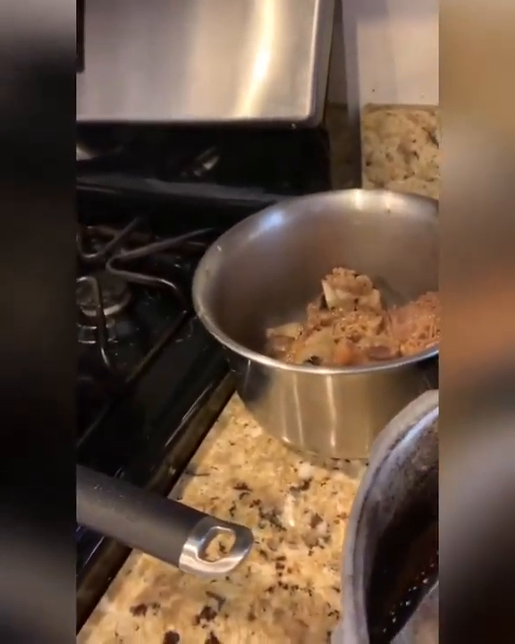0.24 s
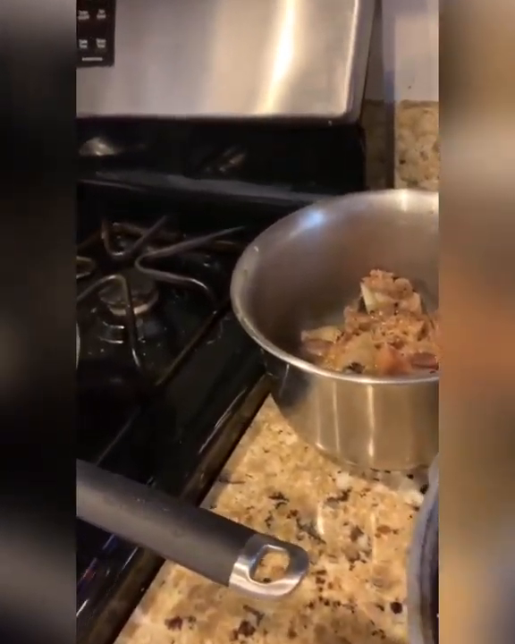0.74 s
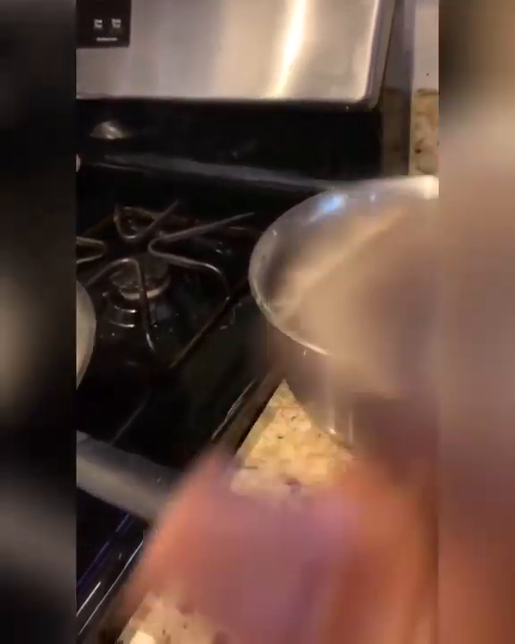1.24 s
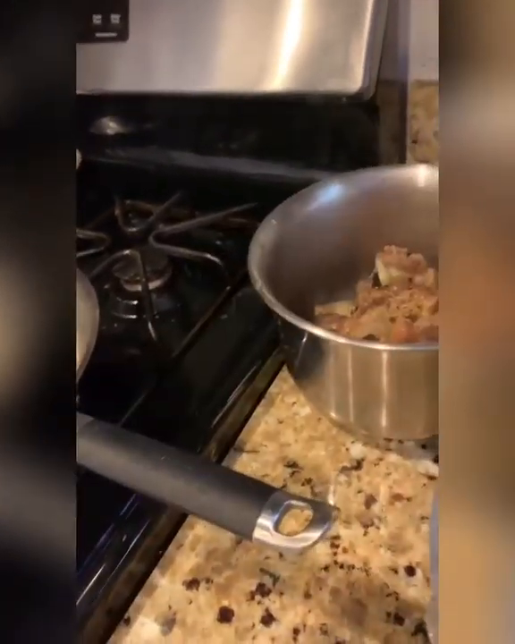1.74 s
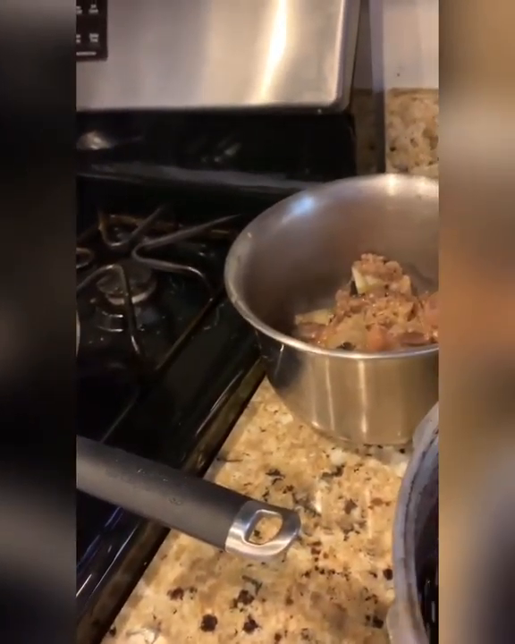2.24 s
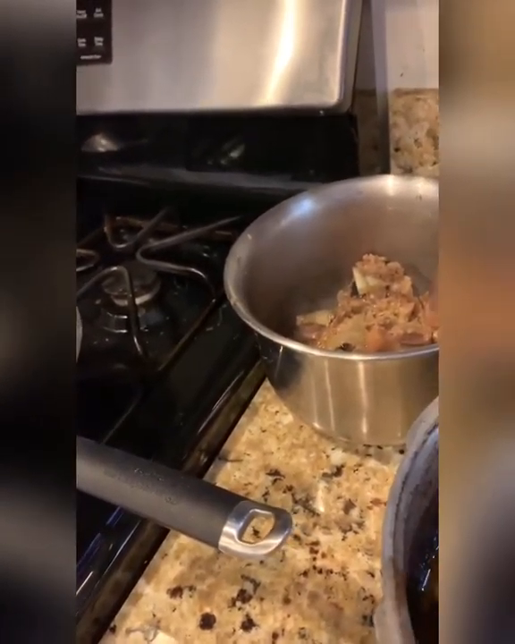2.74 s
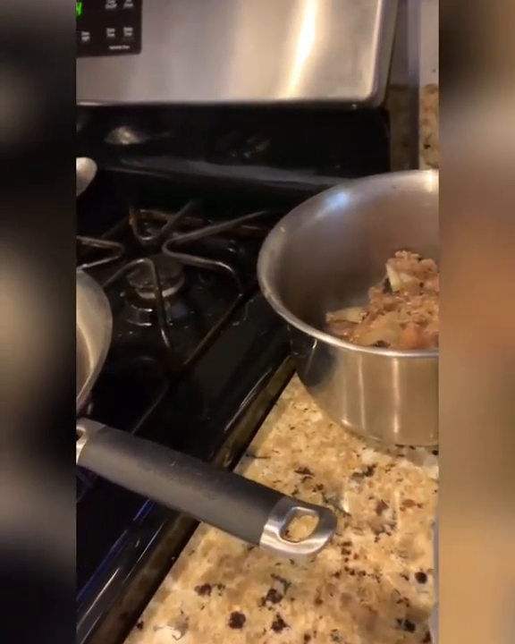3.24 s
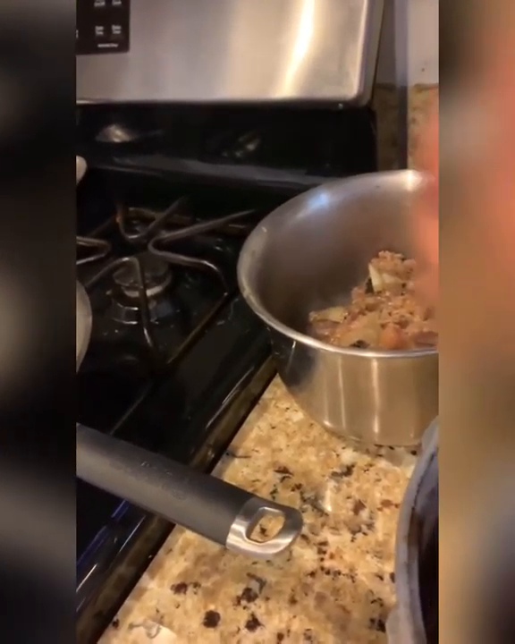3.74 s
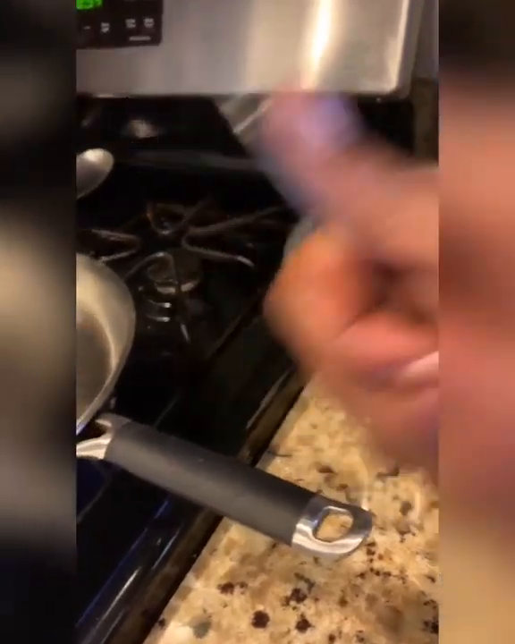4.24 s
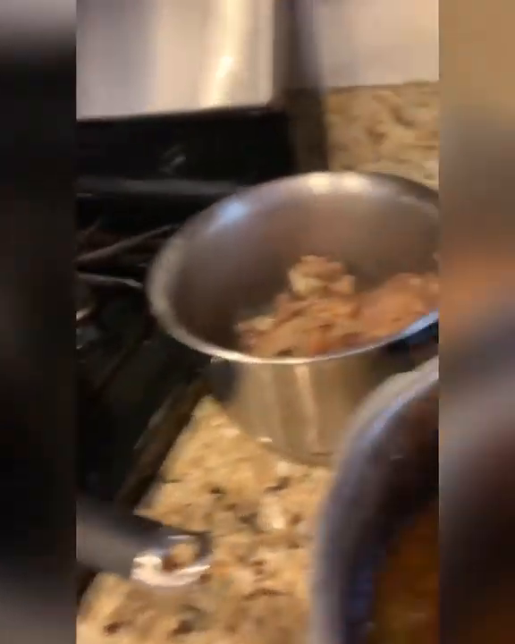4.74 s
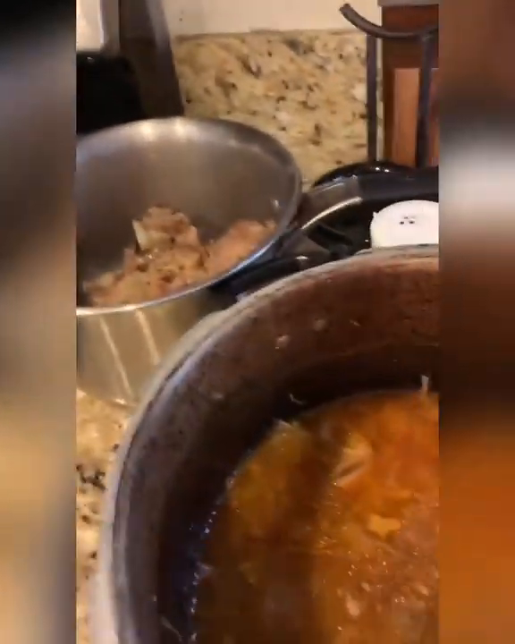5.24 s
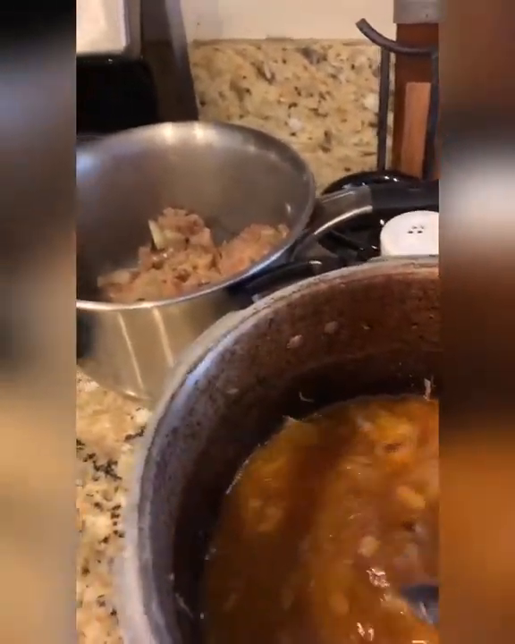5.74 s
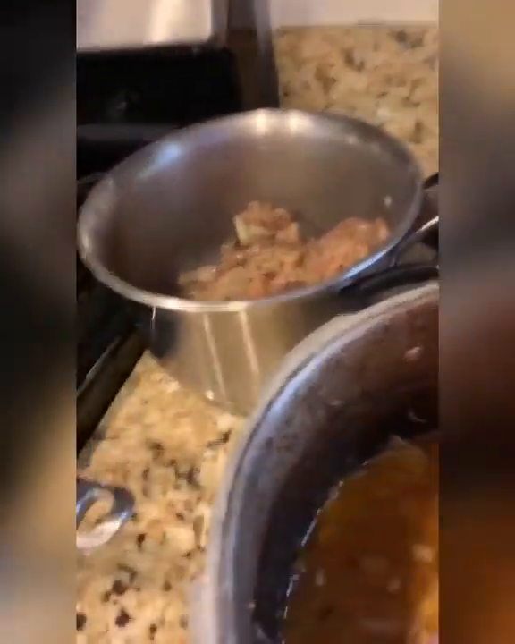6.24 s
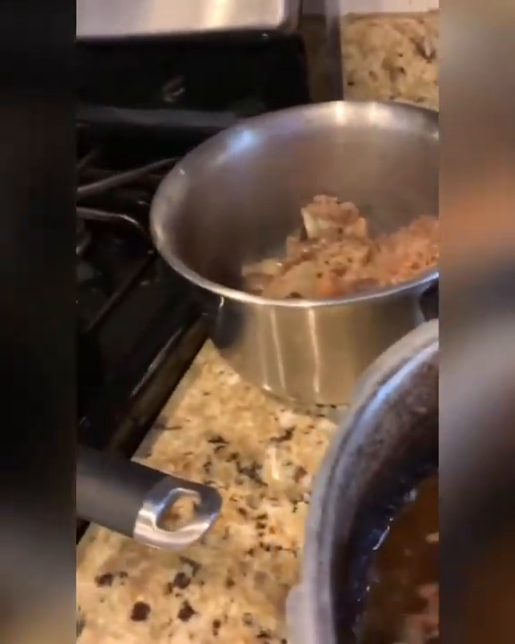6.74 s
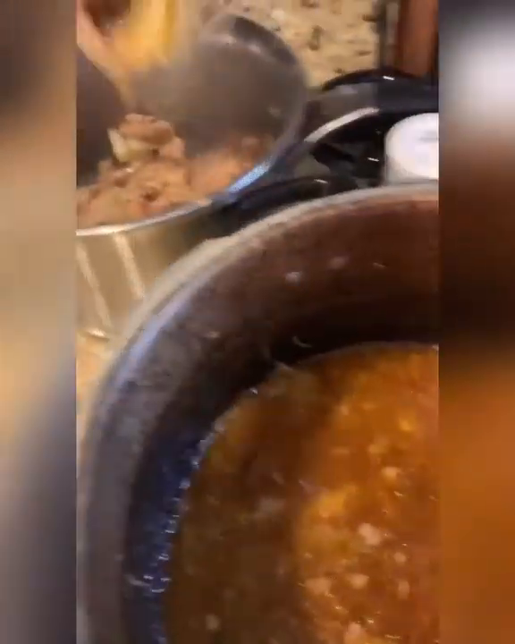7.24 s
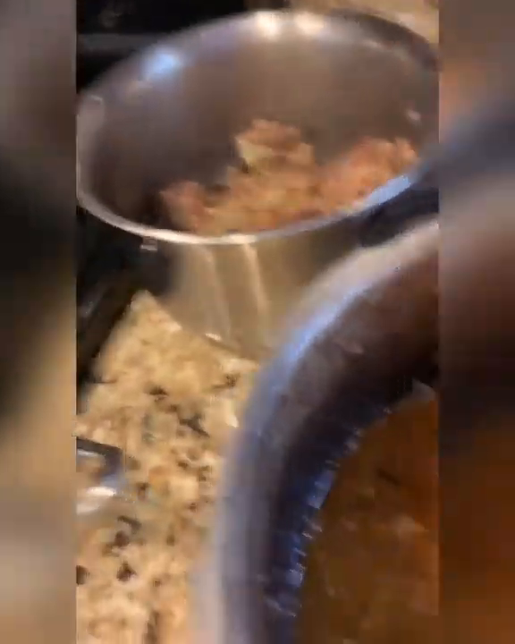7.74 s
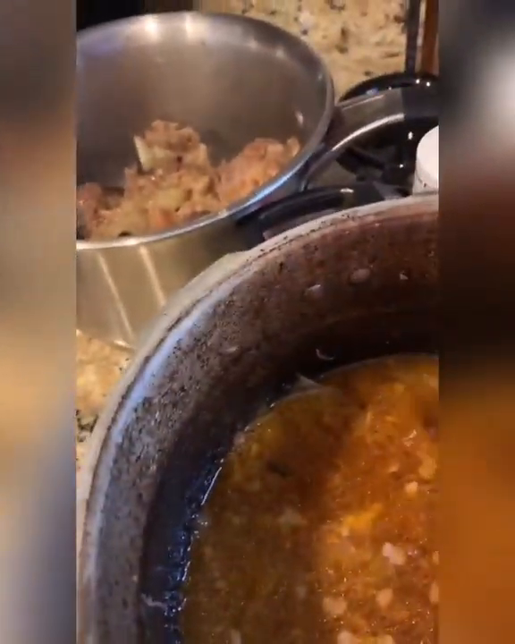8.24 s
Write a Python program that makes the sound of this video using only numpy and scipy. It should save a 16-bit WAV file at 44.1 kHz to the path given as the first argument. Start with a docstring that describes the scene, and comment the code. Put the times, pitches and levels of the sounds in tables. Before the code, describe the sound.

A handheld phone picks up a spoon working at a stew-filled pot on a counter: first light scrapes and ticks with a soft thud, then a dense cluster of scraping, scattered taps, and a sharp cracking knock just past five seconds. A quieter stretch of bubbles and small clicks leads to a hard ringing clank at eight seconds. Narrow hiss, rustling air and low rumble continue behind, with a short hard-walled room tail.

```python
"""Kitchen counter, hand-held phone close to a steel pot of thick stew; a metal spoon scrapes and knocks it.
From the start a steady hiss with narrow resonances, airy puffs and a low rumble lie behind the spoon.
Scrapes crowd together near 3 s; from 4.4 to 5.1 s the hiss changes colour as the phone turns to the stew.
A sharp knock with a bright crack follows at 5.2 s and the hardest knock at 8 s; bubbles, ticks and thuds dot it.
Each contact is a burst of grit that rings rim and stew-damped wall; the background is shaped noise."""
import sys
import numpy as np
from scipy import signal
from scipy.fft import rfft, irfft
from scipy.io import wavfile
from scipy.ndimage import uniform_filter1d

SR = 44100
rng = np.random.default_rng(int(sys.argv[2]) if len(sys.argv) > 2 else 0)


def digitize_waveform(pressure):
    """Quantize a signal to 16-bit integers and store it at the path in sys.argv[1].

    Rows of a 2-D input are taken as channels; values are limited to [-1, 1].
    """
    field = np.atleast_2d(pressure).T
    bounded = np.clip(field, -1, 1)
    quanta = np.round(bounded * 32767).astype(np.int16)
    wavfile.write(sys.argv[1], SR, quanta)


N = 374850


def undb(db):
    """Amplitude factor of a level in dB."""
    return 10 ** (np.asarray(db) / 20)


def fall(t, t60):
    """Exponential decay that loses 60 dB in t60 seconds."""
    return np.exp(-np.log(1000) * t / max(t60, 1e-3))


def seconds(length):
    """Time axis of the given length in s."""
    return np.arange(int(length * SR)) / SR


def add(out, s, x, db):
    """Mix x in at time s with the given peak level."""
    i = int(s * SR)
    x = x[:N - i]
    out[i:i + len(x)] += x * undb(db) / np.max(np.abs(x))


def band(x, hz, octaves):
    """Causal band-pass round hz."""
    edges = [hz * 2 ** (-octaves / 2), hz * 2 ** (octaves / 2)]
    edges = np.clip(edges, 20, .45 * SR)
    return signal.sosfilt(signal.butter(2, edges, "band", fs=SR, output="sos"), x)


def curve(rows):
    """Straight lines through (s, value) points over the whole scene."""
    return np.interp(np.arange(N) / SR, *np.transpose(rows))


def held_noise(count, hold):
    """Random levels held for some samples each, then slewed over the same span."""
    steps = np.repeat(rng.standard_normal(count // hold + 1), hold)
    return uniform_filter1d(steps, hold)[:count]


def walk(rate):
    """Random levels held 1 / rate s and slewed; spread near 1."""
    return 1.6 * held_noise(N, int(SR / rate))


def coloured(colour, peaks=()):
    """Noise of rms 1 with the given spectrum and resonances."""
    f = np.arange(1, N // 2 + 2) * SR / N
    hz, db = np.transpose(colour)
    gain = undb(np.interp(np.log(f), np.log(hz), db))
    for centre, width, rise_db in peaks:
        gain = gain * undb(rise_db / (1 + (2 * (f - centre) / width) ** 2))
    x = irfft(rfft(rng.standard_normal(N)) * gain, N)
    return x / np.std(x)


def flicker(x, edges_hz, depth_db, rate):
    """Each band of a steady noise wanders in level on its own."""
    f, spectrum = np.arange(N // 2 + 1) * SR / N, rfft(x)
    out = np.zeros(N)
    for lo, hi in zip(edges_hz, edges_hz[1:]):
        one_band = irfft(spectrum * (f >= lo) * (f < hi), N)
        out += one_band * undb(depth_db * walk(rate))
    return out


def ring(modes, favoured_hz, reach, t):
    """A struck body: the place of contact favours modes near one pitch, falling reach dB per octave away."""
    out = 0
    for k, (hz, db, t60) in enumerate(modes):
        level = undb(db - reach * abs(np.log2(hz / favoured_hz)))
        # neighbouring modes swing in opposition
        out = out + (-1) ** k * level * fall(t, t60) * np.sin(2 * np.pi * hz * t)
    return out


# Level of the deep bass, gustier while the phone is handled. Each row: time in seconds, level in dB.
DEEP_LEVEL = [(0.0, -57), (0.31, -72), (0.71, -50), (1.42, -66), (1.63, -53), (2.1, -73), (2.74, -60),
              (3.03, -80), (6.23, -69.5), (6.42, -73), (8.07, -69), (8.5, -79)]
# Colour of the deep bass. Each row: frequency in Hz, relative spectrum level in dB.
DEEP_SPECTRUM = [(15, -32), (30, -27), (60, -12), (100, -19), (200, -58)]


def deep_bass():
    """Bass noise whose level wanders about a gusty course."""
    return coloured(DEEP_SPECTRUM) * undb(curve(DEEP_LEVEL) + 2.0 * walk(5.8))


# Level of the room rumble before it flickers. Each row: time in seconds, level in dB.
RUMBLE_LEVEL = [(0.0, -57), (0.47, -59), (0.8, -55), (1.94, -59.5), (2.89, -50.5), (3.1, -54.5), (4.5, -58),
                (4.95, -55.5), (6.94, -60), (8.5, -57)]
# Colour of the rumble. Each row: frequency in Hz, relative spectrum level in dB.
RUMBLE_SPECTRUM = [(15, -50), (25, -27), (53, -6.5), (113, 5), (167, -1.5), (300, -4), (408, -3),
                   (444, -14), (476, -9.5), (637, -9), (682, -6), (1030, -15), (1500, -20.5), (1950, -15),
                   (3300, -120)]


def room_rumble():
    """Low noise, flickering in bands two thirds of an octave wide."""
    rumble = coloured(RUMBLE_SPECTRUM) * undb(curve(RUMBLE_LEVEL))
    return flicker(rumble, 25 * 2 ** (2 * np.arange(11) / 3), 2.57, 6.0)


# Airy treble that comes and goes in puffs. Each row: time in seconds, gain in dB before it wanders.
RUSTLE_GAIN = [(0, -64), (.4, -60), (1.3, -64), (1.85, -59.5), (2.1, -72), (2.5, -61.5), (3.3, -70),
               (4.7, -68), (5.2, -67), (6.9, -65.5), (7.3, -71.5), (8.1, -64.5), (8.5, -67)]


def airy_rustle():
    """Wide treble noise whose level puffs and wanders quickly."""
    treble = band(rng.standard_normal(N), 7900, 2.5)
    return treble * undb(curve(RUSTLE_GAIN) + 4.1 * walk(22.0))


# Smooth hiss colour, phone facing the stove and then the stew.
# Each row: frequency in Hz, relative spectrum level in dB.
STOVE_COLOUR = [(700, -61), (1000, -43), (1500, -2.5), (2270, 2.5), (3000, 1), (4360, 6.5), (5600, 3),
                (7000, -6.5), (8000, -24.5), (11500, -28.5), (16000, 2)]
STEW_COLOUR = [(530, 4), (900, 7), (1570, -5), (2040, -6), (3960, 5.5), (5040, -3), (6330, -6.5),
               (8150, -10), (9770, -4.5), (11600, -41), (16000, 3.5)]
# Narrow resonances on each hiss. Each row: centre in Hz, width in Hz, rise above the smooth colour in dB.
STOVE_WHISTLES = [(2100, 36, 16.6), (2776, 730, 20), (3900, 190, 15), (6360, 550, 12), (6790, 200, 18),
                  (8820, 500, 28.6), (9860, 320, 30.5)]
STEW_WHISTLES = [(2115, 73, 16.5), (2664, 790, 14.5), (4020, 14, 12.6), (6190, 160, 18.8),
                 (6600, 280, 13.3), (7090, 550, 13.8), (10220, 690, 11)]
TURN_START_S, TURN_END_S = 4.4, 5.1
HISS_DB = -56.5  # rms before it flickers


def steady_hiss():
    """Two resonant noises cross-faded at equal power as the phone turns from stove to stew."""
    turn = curve([(TURN_START_S, 0), (TURN_END_S, 1)])
    stove = np.sqrt(1 - turn) * coloured(STOVE_COLOUR, STOVE_WHISTLES)
    stew = np.sqrt(turn) * coloured(STEW_COLOUR, STEW_WHISTLES)
    return (stove + stew) * undb(HISS_DB)


def kitchen():
    """Background behind the pot: hiss and rustle flicker together in narrow bands, over rumble and bass."""
    air = flicker(steady_hiss() + airy_rustle(), 400 * 2 ** (np.arange(49) / 8), 1.22, 12.0)
    return deep_bass() + room_rumble() + air


# Pot and elbows bumping the counter. Each row: start in seconds, peak level in dB, pitch in Hz.
COUNTER_BUMPS = [(0.73, -30.5, 139.5), (0.785, -37.5, 159), (0.961, -43.5, 107), (1.17, -48, 113),
                 (1.478, -50, 135), (0.931, -42, 133.6), (2.412, -27, 119.3), (2.868, -38.5, 116),
                 (3.496, -35.5, 164.6), (3.953, -46.5, 196), (4.808, -36.5, 162), (4.89, -39, 162),
                 (5.101, -45.5, 157), (5.217, -35.5, 142), (7.388, -42, 182.5), (7.986, -36, 194.4),
                 (7.996, -35.5, 123)]
THUD_T60_S = 0.25


def thuds():
    """Soft blows on the counter: one low mode, slowly pushed."""
    out, t = np.zeros(N), seconds(.4)
    for s, db, hz in COUNTER_BUMPS:
        push = (1 - fall(t, 0.0057)) * fall(t, THUD_T60_S)
        add(out, s, push * np.sin(2 * np.pi * hz * t), db)
    return out


# Bubbles in the stew. Each row: start in seconds, peak level in dB, starting pitch in Hz,
# glide in octaves per second, decay t60 in seconds, time until it bursts in seconds.
STEW_BUBBLES = [(3.088, -19.5, 1014, 9.3, 0.081, 0.027), (5.293, -40.5, 1800, 92, 0.068, 0.013),
                (5.334, -32, 3360, 42, 0.029, 0.0072), (5.367, -46, 1690, 19, 0.061, 0.021),
                (6.28, -37, 1590, 14, 0.025, 0.012)]


def bubbles():
    """Air pockets rise in pitch as they near the surface, then burst."""
    out, t = np.zeros(N), seconds(.08)
    for s, db, hz, glide, t60, life in STEW_BUBBLES:
        pitch = hz * 2 ** (glide * np.minimum(t, life))
        tone = np.sin(2 * np.pi * np.cumsum(pitch) / SR)
        burst = fall(np.maximum(t - life, 0), 0.0062)
        add(out, s, np.clip(t / 0.003, 0, 1) * fall(t, t60) * burst * tone, db)
    return out


# Bits of food and sauce snapping, and at 5.22 s the bright crack of a spoon knock.
# Each row: start in seconds, peak level of the narrow core in dB, centre in Hz.
SHARP_TICKS = [(0.558, -42, 4610), (0.5971, -36, 7360), (0.975, -25.5, 5800), (1.0105, -43, 11500),
               (1.109, -42, 11500), (1.1916, -26, 6540), (1.4103, -44.5, 4230), (1.573, -41, 11000),
               (1.969, -32.5, 5150), (3.011, -32, 4470), (3.025, -35, 3870), (3.0948, -27.5, 5100),
               (3.321, -34, 2820), (4.478, -45, 5000), (4.982, -38.5, 7000), (5.2212, -12.5, 5300),
               (5.308, -33.5, 8600), (5.336, -31, 4930), (5.37, -44, 4900), (5.5562, -40, 9300),
               (6.3181, -30.5, 6050), (6.383, -37, 6600), (6.401, -36, 10500), (6.4224, -28, 6050),
               (6.761, -37, 9380), (6.9304, -30.5, 8900), (6.941, -39.5, 3200), (6.989, -33.5, 6930),
               (7.0032, -36, 5000), (7.007, -37, 12700), (7.264, -43, 5400), (7.3503, -33, 7460),
               (7.3677, -22, 6600), (7.452, -27.5, 3600), (7.4548, -26.5, 9150), (8.045, -24.5, 7500),
               (8.158, -21.5, 7050), (8.2355, -27, 4300), (8.2458, -24.5, 5600), (8.306, -29, 5030)]
TICK_SNAP_S, TICK_T60_S = 0.004, 0.067  # t60 of the snap and of its fizz
TICK_FIZZ, TICK_WIDE_DB = 0.14, -2  # fizz re snap; the broad snap re its narrow core


def ticks():
    """A sharp snap of noise with a weaker, longer fizz."""
    out, t = np.zeros(N), seconds(.06)
    for s, db, hz in SHARP_TICKS:
        snap = TICK_FIZZ * fall(t, TICK_T60_S) * rng.standard_normal(len(t))
        snap += fall(t, TICK_SNAP_S) * rng.standard_normal(len(t))
        snap[0] += 4.0  # the first break is the sharpest
        add(out, s, band(snap, hz, 0.38), db)
        add(out, s, band(snap, hz, 1.43), db + TICK_WIDE_DB)
    return out


# The spoon struck free and then gripped or dipped. Each row: start in seconds, peak level in dB,
# favoured mode in Hz, free ringing in seconds, fall-off from that mode in dB per octave.
SPOON_RINGS = [(3.315, -40, 5400, 0.04, 58), (4.796, -42, 5430, 0.06, 160), (4.797, -40, 2660, 0.019, 44),
               (4.886, -39, 2570, 0.013, 42), (4.897, -30.5, 2520, 0.032, 62),
               (4.895, -34.5, 5660, 0.0083, 90), (7.988, -16, 2620, 0.059, -2),
               (8.008, -26.5, 2130, 0.048, 64), (8.157, -43, 2100, 0.029, 55),
               (8.392, -43, 2210, 0.036, 60)]
# Modes of the steel spoon. Each row: pitch in Hz, level in dB before chatter, free decay t60 in seconds.
SPOON_MODES = [(1897, 0, 1.2), (2665, 1, .13), (3668, -6, .5), (4185, -10, .08), (4918, -3, .5),
               (5330, -9, .16), (6410, 0, .15), (6900, -6, .06), (8500, -8, .06), (10178, 3, .07),
               (10452, -4, .08)]
CHATTER_S, CHATTER_DB = 0.0082, 3.5  # step of the waver; its spread before slewing


def spoon():
    """Steel modes that waver as the spoon chatters in the hand, cut short when it is damped."""
    out, t = np.zeros(N), seconds(.25)
    for s, db, hz, free, narrow in SPOON_RINGS:
        modes = []
        for mode_hz, mode_db, t60 in SPOON_MODES:
            chatter_db = CHATTER_DB * held_noise(len(t), int(CHATTER_S * SR))
            modes.append((mode_hz, mode_db + chatter_db, t60))
        damped = fall(np.maximum(t - free, 0), 0.022)
        add(out, s, np.clip(t / 0.00145, 0, 1) * damped * ring(modes, hz, narrow, t), db)
    return out


def shimmer(x, t60, count=64):
    """Through the many short high modes of thin steel, different at every spot."""
    t = seconds(.04)
    place, phase = rng.random((2, count, 1))
    hz = 900 * 18 ** ((np.arange(count)[:, None] + place) / count)
    modes = (np.sqrt(hz) * np.sin(2 * np.pi * (hz * t + phase))).sum(axis=0)
    return signal.fftconvolve(x, modes * fall(t, t60))[:len(x)]


# Modes of the stew-damped pot wall, before detuning and the spoon's pressure.
# Each row: pitch in Hz, level in dB, decay t60 in seconds.
WALL_MODES = [(270, 0, .11), (330, -3, .1), (435, -6, .11), (510, -6, .06), (562, -2, .07), (600, -3, .055),
              (710, -12, .06), (785, -12, .06), (1050, -15, .17), (1088, 1, .058), (1595, -3, .04)]
# Modes of the pot's rim. Each row: pitch in Hz, level in dB, decay t60 in seconds.
RIM_MODES = [(1400, -23, 0.34), (1811, 22, 0.021), (2008, 10.5, 0.093), (2220, 22, 0.017),
             (2620, 14, 0.022), (3504, 5, 0.039), (3915, 12.5, 0.015), (4690, 7.5, 0.024), (4960, 5, 0.023),
             (6200, -19, 0.013), (5730, 12, 0.021), (6640, 9, 0.04), (8000, 0, 0.015)]
PRESS_DAMPING = 0.9  # a dragged spoon shortens the wall's ring to this share
SLOSH, KNOCK_SLOSH = 0.021, 0.009  # spread of the wall's detuning by moving stew, under a drag and a knock
RIM_DB, SLAP_DB, KNOCK_SLAP_DB = -4.5, -3.5, -8.5  # rim re grit; stew's slap re pot, under a drag and a knock


def contact(row, rise, hold, t60, dragged, grain_db=5.5, blow_s=0.0066):
    """Grit under the spoon: uneven micro-slips heard directly, through the rim and through the pot wall."""
    s, db, hz, treble_db, pot_db, pot_hz = row
    t = seconds(.45)
    press = np.clip(t / rise, 0, 1) * fall(np.maximum(t - rise - hold, 0), t60)
    slips = undb(grain_db * np.repeat(rng.standard_normal(len(t) // 64 + 1), 64)[:len(t)])
    grit = press * slips * rng.standard_normal(len(t))
    # the quicker the touch, the stronger the one clean blow in it
    push = grit / np.sqrt(np.sum(grit ** 2))
    push[int(rise * SR)] += blow_s / (rise + hold / 4)
    if not dragged:
        grit[int(rise * SR)] += 6.7
    detune = 1 + (SLOSH if dragged else KNOCK_SLOSH) * rng.standard_normal(len(WALL_MODES))
    damping = PRESS_DAMPING if dragged else 1
    wall = [(f * d, g, ring_s * damping) for (f, g, ring_s), d in zip(WALL_MODES, detune)]

    direct = band(shimmer(grit, 0.022 if dragged else 0.012), hz, 2.14)
    rim = signal.fftconvolve(push, ring(RIM_MODES, hz, 13.8, t))[:len(t)]
    slap = band(grit, pot_hz, 2.45)  # the stew's dull slap
    treble = band(shimmer(grit, 0.0095), 13800, 3.6)
    pot = signal.fftconvolve(push, ring(wall, pot_hz, 12.7, t))[:len(t)]
    return [(direct, db),
            (rim, db + RIM_DB),
            (slap, db + pot_db + (SLAP_DB if dragged else KNOCK_SLAP_DB)),
            (treble, db + treble_db),
            (band(pot, 640, 6.3), db + pot_db)]


# Spoon knocking the pot. Each row: start in seconds, grit peak in dB, grit centre in Hz, treble in dB re grit,
# pot in dB re grit, favoured pot mode in Hz, decay t60 in seconds.
POT_KNOCKS = [ (0.744, -31.5, 4170, -31, -25, 315, 0.13), (1.135, -36, 3200, -1, 1, 1010, 0.13),
              (3.495, -26, 2940, -63, -4.5, 362, 0.072), (3.949, -26.5, 2740, -28, -4.5, 900, 0.016),
              (4.794, -37.5, 2830, -3, 10.5, 810, 0.25), (5.118, -42.5, 1780, -16, 17, 1070, 0.074),
              (5.221, -28, 4930, -17, 16, 1054, 0.0073), (5.44, -28, 6060, -24, -17.5, 580, 0.036),
              (6.21, -27, 1650, -15, -11.5, 1510, 0.02), (6.403, -34, 4300, -6, -6.5, 1150, 0.16),
              (7.386, -21.5, 4600, 4, -18, 200, 0.1), (7.982, -8, 4950, -5, -7, 800, 0.047),
              (7.992, -27, 2630, -9, 16.5, 540, 0.063), (8.154, -32, 4640, 11.5, -7.5, 304, 0.07),
              (8.2452, -27, 2120, -9, -20, 331.6, 0.085), (8.38, -31, 5400, -29, -22, 990, 0.026),
              (8.387, -28, 2870, -28, -16.5, 374, 0.07)]
KNOCK_RISE_S, KNOCK_HOLD_S = 0.0013, 0.0023
# Spoon scraping the pot. Each row: start in seconds, grit peak in dB, grit centre in Hz, treble in dB re grit,
# pot in dB re grit, favoured pot mode in Hz, length in seconds.
POT_SCRAPES = [ (0.487, -42, 4500, -16, -5.5, 326, 0.045), (0.718, -29.5, 3400, -31, -2, 570, 0.023),
               (0.886, -37.5, 3600, 1, -5, 432, 0.027), (0.908, -37.5, 3950, 3, 4, 575, 0.048),
               (0.949, -41.5, 2800, 3, 10.5, 620, 0.0156), (0.971, -34.5, 3870, -25, 1, 625, 0.041),
               (1.1, -49.5, 5400, 3.5, 11.5, 577, 0.039), (1.47, -51.5, 1810, -8, 3, 393, 0.32),
               (2.225, -32, 3460, -13, -7, 430, 0.11), (2.241, -43, 2470, 8.5, 5, 270, 0.078),
               (2.325, -38, 3540, 4.5, -2, 265, 0.1), (2.403, -32.5, 1950, -3, 3, 496, 0.013),
               (2.642, -42.5, 3430, -3, 11.5, 546, 0.026), (2.73, -37, 2860, -6, 7.5, 570, 0.033),
               (2.805, -31, 2770, -7, 2, 644, 0.023), (2.853, -24.5, 2220, 0, -0.5, 560, 0.03),
               (2.894, -33, 2000, 0.5, -5.5, 570, 0.032), (2.944, -28.5, 1920, -4, -9.5, 340, 0.044),
               (2.969, -24.5, 1900, -12, -16, 560, 0.031), (2.992, -33, 3800, -1.5, -7.5, 1110, 0.081),
               (3.052, -28.5, 1890, -12, -9.5, 556, 0.019), (3.296, -30, 2870, -6.5, -2, 332, 0.091),
               (3.331, -31, 1670, -9, -2, 656, 0.06), (3.423, -42.5, 4370, -17, 1.5, 648.3, 0.098),
               (3.957, -35, 2450, -19, -2.5, 328, 0.044), (3.979, -38.5, 3950, -18, 0.5, 800, 0.034),
               (4.051, -37.5, 1900, -22, -9, 1000, 0.042), (4.871, -37, 4360, -11, 4, 495, 0.031),
               (4.881, -32.5, 5100, -22, -6, 442, 0.046), (5.008, -38, 2070, 3, -13, 330, 0.12),
               (5.085, -25, 2160, 1.5, -3.5, 665, 0.049), (5.692, -59.5, 2000, -9, 14, 560, 0.36),
               (6.2, -31.5, 2300, -0.5, -17, 413, 0.086), (6.236, -40, 2460, -7, 6.5, 400, 0.07),
               (7.34, -32.5, 7000, -6, -32, 300, 0.034), (8.198, -30, 4800, 3.5, -8, 326, 0.022)]
# pressure builds, holds and dies away (t60) over these shares of the length
SCRAPE_RISE, SCRAPE_HOLD, SCRAPE_FALL = 0.29, 0.078, 2.2
# Spoon rubbing on evenly. Each row: start in seconds, grit peak in dB, grit centre in Hz, treble in dB re grit,
# pot in dB re grit, favoured pot mode in Hz, hold in seconds.
POT_RUBS = [(1.464, -38, 2700, -0.5, 0.5, 1070, 0.016), (0.752, -50.5, 3300, 8, 10, 570, 0.08),
            (0.87, -46.5, 4700, 0, 6.5, 680, 0.14), (3.958, -36, 3030, -11, -2.5, 740, 0.092),
            (8.015, -45, 1500, 1, 7.5, 620, 0.11)]
RUB_RISE_S, RUB_T60_S = 0.0072, 0.12


def contacts():
    """Knocks land at once and die away; scrapes swell and fade with their length; rubs hold and fade."""
    out = np.zeros(N)
    shapes = [(row, KNOCK_RISE_S, KNOCK_HOLD_S, t60, False) for *row, t60 in POT_KNOCKS]
    for *row, length in POT_SCRAPES:
        shapes.append((row, SCRAPE_RISE * length, SCRAPE_HOLD * length, SCRAPE_FALL * length, True))
    shapes += [(row, RUB_RISE_S, hold, RUB_T60_S, True) for *row, hold in POT_RUBS]
    for row, rise, hold, t60, dragged in shapes:
        for x, db in contact(row, max(rise, 2e-4), hold, t60, dragged):
            add(out, row[0], x, db)
    return out


ROOM_DB, ROOM_T60_S = -20.5, 0.43


def room(near):
    """Hard walls and tiles give a short dense tail."""
    t = seconds(.5)
    tail = band(rng.standard_normal(len(t)), 730, 5.7) * fall(t, ROOM_T60_S) * (t > .004)
    return undb(ROOM_DB) * signal.fftconvolve(near, tail / np.sqrt(np.sum(tail ** 2)))[:N]


def scene():
    """Close sounds at the pot with their room tail, in front of the kitchen background."""
    near = contacts() + ticks() + bubbles() + spoon() + thuds()
    return (near + room(near) + kitchen())[None]


TOP_HZ = 15800


def record(dry):
    """The phone's microphone thins the deep bass and cuts the top."""
    thin = signal.sosfilt(signal.butter(2, 45, "highpass", fs=SR, output="sos"), dry)
    return signal.sosfilt(signal.ellip(10, .2, 60, TOP_HZ, fs=SR, output="sos"), thin)


dry = scene()
out = record(dry)
digitize_waveform(out)
```